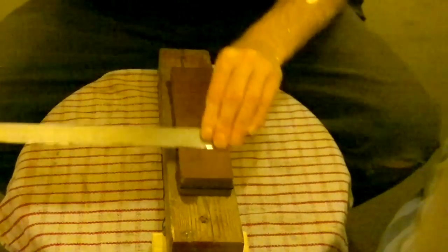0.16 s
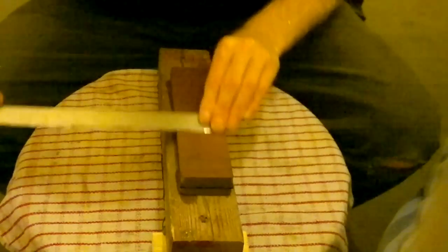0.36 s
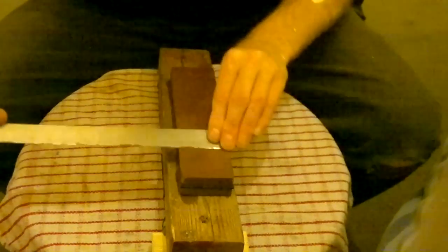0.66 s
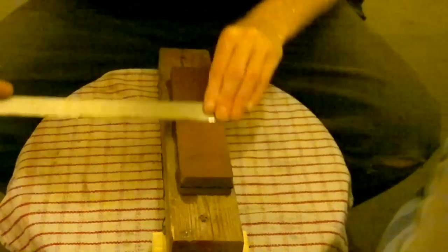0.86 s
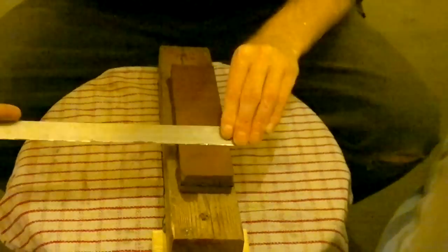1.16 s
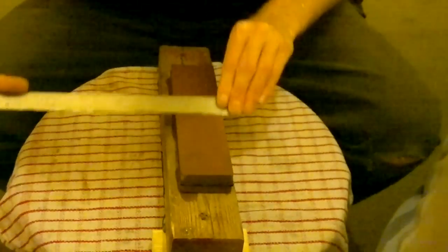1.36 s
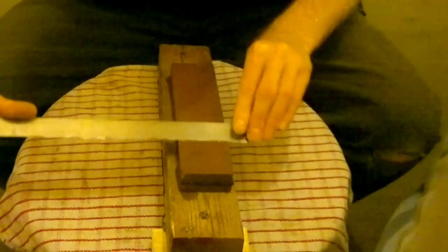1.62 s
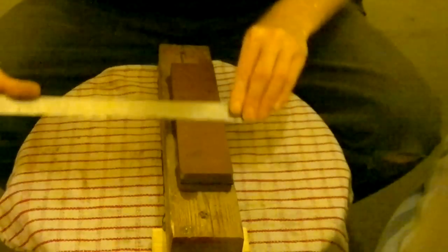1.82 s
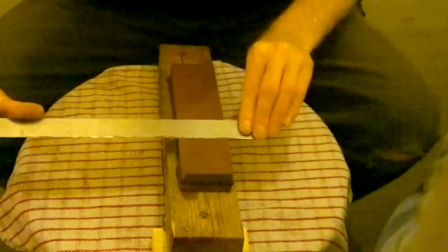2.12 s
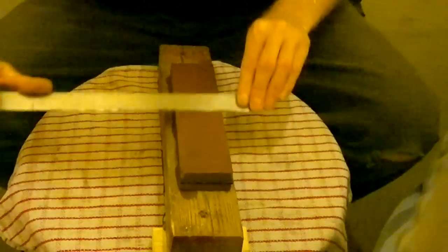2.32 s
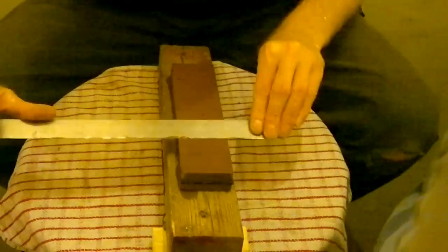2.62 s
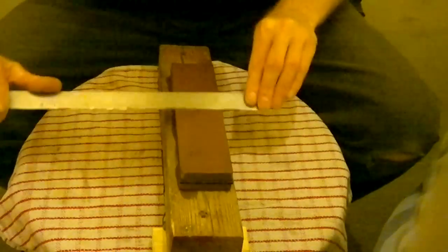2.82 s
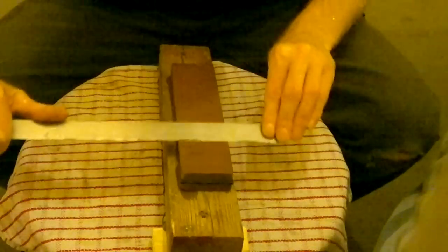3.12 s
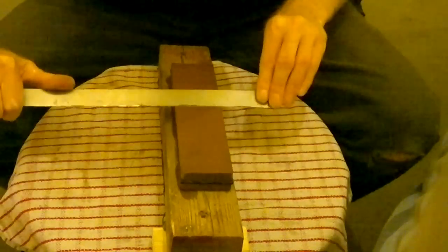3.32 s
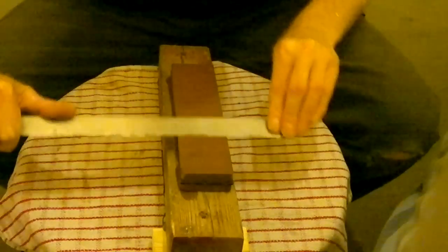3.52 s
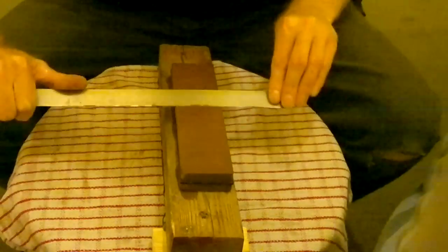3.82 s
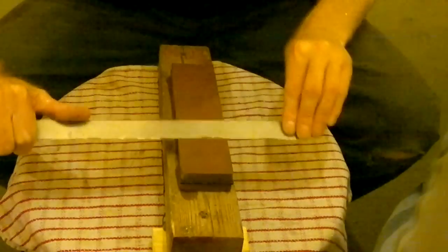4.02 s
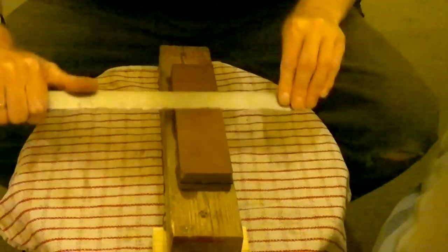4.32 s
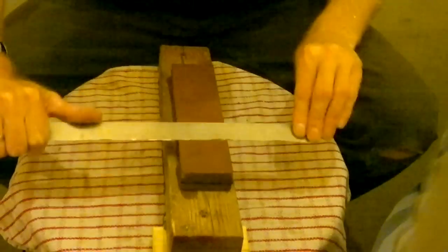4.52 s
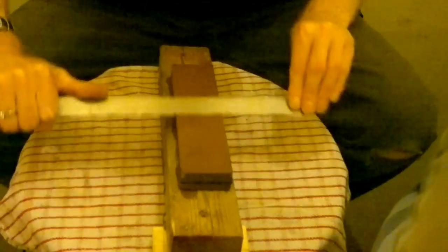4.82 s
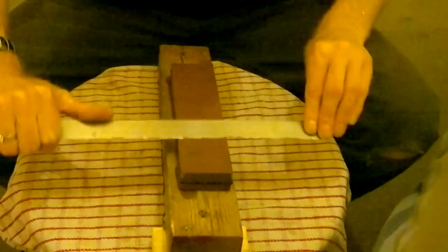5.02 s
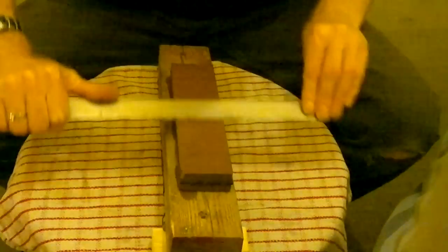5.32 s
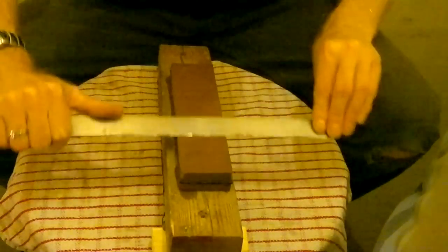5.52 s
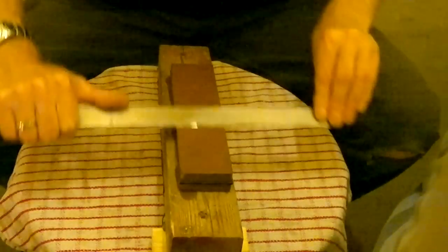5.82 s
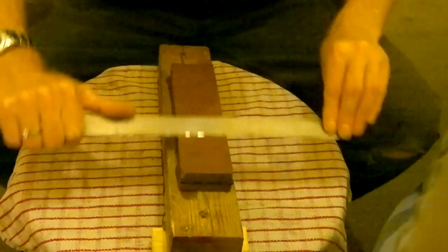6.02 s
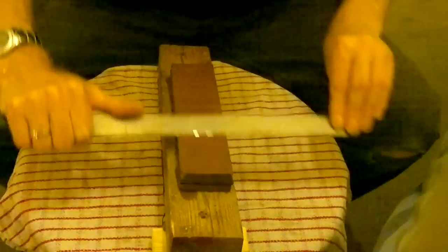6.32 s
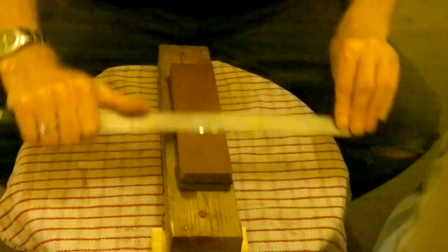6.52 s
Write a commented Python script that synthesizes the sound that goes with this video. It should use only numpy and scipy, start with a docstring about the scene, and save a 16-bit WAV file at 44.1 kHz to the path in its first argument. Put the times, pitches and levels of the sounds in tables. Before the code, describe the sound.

Steady, fast scraping of steel on fine stone, a sandy 'shick-shick' with airy hiss and slight blade ringing. Strokes alternate in strength, pushes often fuller than pulls, with tiny gaps between them. Later, faint dull bumps of the board on cloth come between strokes. Heard close and dry in a small indoor space, over very quiet rumble and a weak wavering mains hum.

```python
"""A steel blade is pushed and pulled over a wet whetstone, about four strokes a second, in a quiet room.
Random grain contacts make the scratch and drive damped blade resonances, which change from tip to heel.
Body, scrape and hiss bands follow a sliding-speed curve; a moving resonance adds the bite.
A short noise tail is the room; the board bumps dully on the cloth; noise rumble and a sine hum lie below."""
import sys
import numpy as np
from scipy import signal
from scipy.fft import rfft, irfft
from scipy.io import wavfile
from scipy.ndimage import uniform_filter1d

SR = 44100
rng = np.random.default_rng(int(sys.argv[2]) if len(sys.argv) > 2 else 0)


def master(y):
    """Save y as 16-bit WAV."""
    cut = np.clip(np.atleast_2d(y).T, -1, 1)
    pcm = np.round(cut * 32767)  # scale
    wavfile.write(sys.argv[1], SR, pcm.astype(np.int16))


N = 293706


# Colour of grit on steel, before the bands are levelled: freq_hz, relative_db_per_hz
SCRATCH_COLOUR = [(760, -31), (1300, -47), (1440, -35.5), (1880, -17.5), (2660, -11), (3170, -3),
                  (4780, -3.5), (5260, -4), (6550, -5.5), (8610, -6), (10200, -3), (11200, -5.5),
                  (15200, -6), (16000, -15)]
# Scratch, left over right: freq_hz, left_right_db
SCRATCH_BALANCE = [(1500, 8.5), (2600, 3), (3300, -2), (4900, 3.5), (6500, -3), (7400, -6.5), (10000, -0.5),
                   (12000, -3), (15500, -8.5)]
# Scratch, likeness of the channels: freq_hz, likeness_0_to_1
SCRATCH_LIKENESS = [(2000, 0.3), (3700, 0.22), (5200, 0.6), (6500, 0), (9500, 0.32), (12000, 0.74),
                    (15000, 0.5)]
# Scratch, phase by which left leads: freq_hz, lead_rad
SCRATCH_PHASE = [(1800, 3), (3500, 1.5), (4500, 4.5), (5500, 3.5), (6500, 1.8), (7500, -0.5), (9000, -1.5),
                 (11000, -1.9), (14000, 2.5)]
BODY_TOP_HZ, HISS_BOTTOM_HZ = 2900, 7500   # scrape lies between
RING_DB = -5.5   # all fixed modes together
BITE_WIDTH_HZ, BITE_SIDE_DB = 3500, 1.5   # left up, right down
BODY_FLICKER_DB = 2.5
SPEED_POWER = 19


def strokes():
    """Rubbing: grit and ringing blade, split in bands whose gain is a power of sliding speed."""
    hiss_db, tilt_db, body_db, left_right_db, bite_hz, bite_db, lower_db, upper_db = stroke_colour()
    grains = grit()
    driven = grains + from_db(RING_DB) * blade_ring(grains) + gliding_ring(grains, lower_db, upper_db)
    rubbed = stereo_colour(driven, SCRATCH_COLOUR, SCRATCH_BALANCE, SCRATCH_LIKENESS, SCRATCH_PHASE)

    body = lowpass(rubbed, BODY_TOP_HZ)
    below_hiss = lowpass(rubbed, HISS_BOTTOM_HZ)
    hiss = patchy(rubbed - below_hiss, tilt_db)
    scrape = below_hiss - body
    # the pressed part of the blade: a broad hump that moves with pressure and angle
    hump = moving_resonance(scrape, bite_hz, BITE_WIDTH_HZ)
    hump = moving_resonance(hump, bite_hz, BITE_WIDTH_HZ)
    scrape = scrape + from_db(bite_db + np.array([[BITE_SIDE_DB], [-BITE_SIDE_DB]])) * hump

    layers = evened(scrape)
    layers = layers + from_db(hiss_db) * evened(hiss)
    layers = layers + from_db(body_db + BODY_FLICKER_DB * drift(9.2)) * evened(body)
    side_db = left_right_db * np.array([[.5], [-.5]])
    return layers * stroke_speed() ** SPEED_POWER * from_db(catches() + side_db)


# One row per stroke, push and pull in turn; *_after_s count from the turn, release_s back from the next turn:
# turn_s, turn_level_db, rest_s, attack_end_after_s, attack_end_level_db, middle_after_s, middle_level_db,
# release_s, release_start_level_db, hiss_over_scrape_db, hiss_rise_db, body_over_scrape_db,
# bite_early_hz, bite_late_hz, bite_early_db, bite_late_db, lower_glide_db, upper_glide_db
STROKES = [(-0.19, -60.0, 0.006, 0.04, -40.0, 0.12, -40.0, 0.049, -41, -7.5, -1, -24, 4600.0, 5380.0, 1.5, -1, 0.6, 2.8),
           (0.044, -66.5, 0.006, 0.035, -52, 0.088, -47, 0.041, -46.5, -1, -2, -14.5, 4670.0, 4650, 8, 6, 4, 1.8),
           (0.259, -63.2, 0.009, 0.035, -40, 0.096, -38.5, 0.048, -42, -4.0, 0.5, -33, 4640, 4800, -21, -7.9, 1, 2.4),
           (0.499, -61.5, 0.009, 0.036, -44, 0.081, -45.5, 0.043, -46, -3, 3, -20, 4800, 4100, 4, 6, 7.5, 4.5),
           (0.725, -68, 0.0087, 0.034, -35, 0.079, -32.5, 0.056, -38, -5, 0.5, -25.5, 5350.0, 5200, 1.9, -1, -15, 4),
           (0.978, -53, 0.014, 0.032, -37.5, 0.11, -44.5, 0.071, -33, -4, -2, -22.5, 4840, 4200, 2, 6, 5, 4.0),
           (1.206, -52.5, 0.007, 0.046, -33, 0.132, -29, 0.058, -35.5, -7.5, -0.5, -29, 4430, 4230, -1, -2, -2, 2.7),
           (1.465, -52.5, 0.01, 0.055, -39.5, 0.14, -37, 0.047, -48, -4.5, -0.2, -24.5, 4670, 5160, -5, -17, -0.0, 1.4),
           (1.707, -73, 0.009, 0.05, -39.5, 0.13, -35, 0.069, -36, -4.5, -5, -22, 4780, 4700.0, -14.4, -20, 1.5, 2),
           (1.967, -59, 0.006, 0.046, -37.5, 0.061, -42.5, 0.039, -47, -4, -1.2, -23.5, 5000, 4900, -5, -6, 5, 2.2),
           (2.177, -67.5, 0.009, 0.056, -38.5, 0.13, -35.5, 0.052, -40, -3.2, -1, -22, 4540.0, 4440, -6, -12, 6, 4.2),
           (2.42, -54.5, 0.007, 0.037, -38.5, 0.13, -48.1, 0.045, -43.5, -3.5, -2, -23.5, 4530.0, 4960.0, -13, -25, 3, 1.5),
           (2.646, -67.5, 0.011, 0.037, -41.5, 0.1, -35.5, 0.041, -38.5, -4, 1.0, -24, 4720.0, 4550.0, -11, -14, -1, 1.7),
           (2.892, -55.9, 0.002, 0.048, -36, 0.13, -42, 0.058, -38, -5, 1, -22.2, 4700, 5040, -10, -10, -2, 2.4),
           (3.143, -56.6, 0.007, 0.034, -39.4, 0.11, -36, 0.059, -35.5, -4.5, -2, -23, 4800, 4620.0, -15, -16, 5.5, 3.0),
           (3.384, -50, 0.007, 0.029, -38.5, 0.061, -35, 0.077, -39.4, -4, 2.8, -17.5, 4220, 4950, -1.5, -8.1, 5.5, 1.8),
           (3.62, -67, 0.0065, 0.038, -40.5, 0.14, -37.5, 0.049, -42.9, -1, 3, -17.5, 4800, 5100, -6, -5, -3, 5.1),
           (3.857, -58.4, 0.007, 0.041, -41, 0.17, -45.5, 0.039, -51.5, -1, 0, -21, 4930.0, 4740, -7.5, -3.4, 2, 2.9),
           (4.095, -73.5, 0.007, 0.039, -43, 0.11, -38, 0.044, -41.5, -0.5, 0.5, -18, 4500, 4660.0, -4, -2.3, 4, 1.4),
           (4.33, -59.5, 0.004, 0.044, -41.5, 0.14, -48.5, 0.039, -49.5, -0.8, 0.2, -18.5, 4560, 4940, -3.6, -2, 1.4, 3.4),
           (4.568, -70, 0.007, 0.047, -42, 0.11, -38.5, 0.054, -41.5, -0.5, -1.5, -16, 4910.0, 4820.0, -8, -3, 1.2, 3.8),
           (4.805, -58.5, 0.007, 0.027, -44, 0.055, -39, 0.038, -52, -3, 0.5, -22.4, 4760.0, 4750.0, -3, -1.9, -3, 4.2),
           (5.033, -73.5, 0.007, 0.049, -40, 0.13, -36, 0.055, -38.5, -3, 2.5, -17, 4780.0, 4800, -9, 0, 2, 3.2),
           (5.278, -57.5, 0.004, 0.03, -45, 0.083, -39.5, 0.068, -43, -2, -1, -18, 4700, 4730, -5, -3, 5, 2.7),
           (5.512, -67, 0.01, 0.037, -47.5, 0.11, -42, 0.038, -46.5, -0.5, 1, -16, 4750, 4850, -7, -4, 5, 1.6),
           (5.746, -61.5, 0.003, 0.041, -42.5, 0.057, -42.5, 0.028, -55.7, -1.5, 0.8, -19.5, 4700, 4480, -8.4, -4.4, 1.5, 2.3),
           (5.982, -73, 0.008, 0.049, -42, 0.092, -42, 0.047, -37.5, -3, -0.5, -18.5, 4770.0, 4950, -8, -5, 0, 1.3),
           (6.218, -51, 0.0076, 0.05, -37.5, 0.15, -46.5, 0.041, -53.5, -4.5, 0, -22, 4660, 5030, -8, -10, -2, 2.6),
           (6.461, -71.6, 0.006, 0.056, -39, 0.06, -40.5, 0.04, -38.5, -3.5, -0.6, -20, 4770, 4700.0, -10, -1, 1, 2)]
LAST_TURN_S, LAST_TURN_DB = 6.71, -60
HALFWAY_UP, HALFWAY_DOWN = 0.54, 0.53   # share of the speed step held halfway through attack, release


def stroke_speed():
    """Relative sliding speed: rest, attack, middle, release; straight between the points."""
    turn, turn_db, rest, attack, early_db, middle, middle_db, release, late_db = np.transpose(STROKES)[:9]
    next_turn = np.append(turn[1:], LAST_TURN_S)
    next_turn_db = np.append(turn_db[1:], LAST_TURN_DB)
    levels_db = np.array([turn_db, early_db, middle_db, late_db, next_turn_db])
    slow, early, mid, late, last = from_db(levels_db / SPEED_POWER)
    points_s = np.c_[turn, turn + rest, turn + (rest + attack) / 2, turn + attack, turn + middle,
                     next_turn - release, next_turn - release / 2].ravel()
    half_up = slow + HALFWAY_UP * (early - slow)
    half_down = last + HALFWAY_DOWN * (late - last)
    speed = np.c_[slow, slow, half_up, early, mid, late, half_down].ravel()
    order = np.argsort(points_s)
    points_s = np.append(points_s[order], LAST_TURN_S)
    speed = np.append(speed[order], last[-1])
    return in_time(np.c_[points_s, speed])[0]


# Shape shared by all pushes, added to each stroke's own values:
# stroke_share_0_to_1, hiss_db, hiss_tilt_db, body_db, left_right_db, bite_shift_hz, bite_db
PUSH_SHAPE = [(0, -1, -4, -17, 3.5, -200, 2), (.08, -7, 0, -1, 8.5, -100, 1), (.16, -3, 0, 2, 3.5, -100, 2),
              (.24, 0.2, -1, 2.5, 0.5, 33, 2.5), (.4, 0.6, 0.5, -1.5, 0.7, 100, 1.5),
              (.6, 0.6, 2, -2, 0, 200, 0.5), (.8, -2.5, 2, 3.5, -1, 96, -6),
              (.9, -3.5, -5, 3, -2.5, 100, -4), (.99, -4, -4, -6, 0, 100, 1)]
# The same for all pulls:
# stroke_share_0_to_1, hiss_db, hiss_tilt_db, body_db, left_right_db, bite_shift_hz, bite_db
PULL_SHAPE = [(0, 0, 0, -0.39, 2.2, 100, 2), (.08, -3.5, -3, 1.5, 4.3, -50, 1.5),
              (.16, -3.5, 1.5, 1.7, 3.1, -150, 0.5), (.24, 0.5, 0, 0, 0.83, 30, 0.5),
              (.4, 0.8, 0, -2.4, 0.32, 100, 1), (.6, 1, 0.5, -1.5, 0.6, 152, 1.5),
              (.8, -2, -2, 0.64, 0.5, 100, 1), (.9, -3, -4, -3, 0.6, 50, -3), (.99, -6, -4, 0, 2.7, 30, -3)]
EARLY_SHARE, LATE_SHARE = .3, .7   # early values hold before, late values after


def stroke_colour():
    """Band, side, bite and ring curves: pressure and angle through a push or pull, plus each stroke's own."""
    ends_s = [row[0] for row in STROKES[1:]] + [LAST_TURN_S]
    rows = []
    for k, (row, end_s) in enumerate(zip(STROKES, ends_s)):
        turn_s = row[0]
        hiss_db, rise_db, body_db, early_hz, late_hz, early_db, late_db, lower_db, upper_db = row[9:]
        shape = (PUSH_SHAPE, PULL_SHAPE)[k % 2]
        for share, more_hiss_db, tilt_db, more_body_db, left_right_db, shift_hz, more_bite_db in shape:
            late = np.clip((share - EARLY_SHARE) / (LATE_SHARE - EARLY_SHARE), 0, 1)
            rows.append((turn_s + share * (end_s - turn_s),
                         hiss_db + more_hiss_db + rise_db * (late - .5),
                         tilt_db,
                         body_db + more_body_db,
                         left_right_db,
                         early_hz + late * (late_hz - early_hz) + shift_hz,
                         early_db + late * (late_db - early_db) + more_bite_db,
                         lower_db, upper_db))
    return in_time(rows)


# The edge catches the stone soon after a turn: catch_s, jump_db
CATCHES = [(0.284, 2), (0.525, 1), (0.754, 0.5), (1.0, 2), (1.234, 3), (1.741, 4), (2.002, 3), (2.225, 4),
           (2.672, 1), (3.168, 3), (3.649, 3), (4.126, 2), (4.602, 1), (4.829, 1), (5.057, 1), (5.543, 2),
           (6.022, 2.5), (6.486, 4)]
CATCH_FADE_S = 0.01


def catches():
    """Level change in dB as the edge catches: held back by half the jump, then ahead by half, both fading."""
    t = np.arange(N) / SR
    return sum(jump_db / 2 * np.sign(t - s) * np.exp(-np.abs(t - s) / CATCH_FADE_S)
               for s, jump_db in CATCHES)


GRAINS_PER_S, GRAIN_SPREAD_DB = 16000, 1.5


def grit():
    """Two trains of uneven grain contacts of random sign, coming in clumps where the edge bites."""
    size_db = GRAIN_SPREAD_DB * np.minimum(rng.exponential(1, (2, N)), 5)
    sizes = from_db(size_db) * rng.choice([-1, 1], (2, N))
    hits = rng.random((2, N)) < GRAINS_PER_S / SR
    clumps_db = 0.15 * drift(23) + 1.0 * drift(520)
    return rms_one(sizes * hits) * from_db(clumps_db)


# Blade modes, levels before the common ring level: mode_hz, width_hz, tip_db, middle_db, heel_db
BLADE_MODES = [(3252, 66, 0, 1.6, 0.76), (3778, 48, 8.5, 3, 2.2), (4173, 140, 7.5, 2.4, 4.5),
               (4620, 75, 6.5, 1.4, 1), (4865, 73, 8, 1.6, 0.33), (5165, 49, 10, 0.84, 0.33),
               (5690, 68, 9, 0.1, 0.033), (7040, 44, -18, 2.7, 1.1), (7230, 42, -2, 1.7, 0.67),
               (11000, 110, 4, 7.9, 1.6)]
# Contact along the blade: time_s, place_0_tip_to_1_heel
CONTACT_PLACE = [(0, 0.076), (1.4, 0.15), (3.3, 0.64), (6.66, .99)]
FLICKER_DB = 4


def blade_ring(grains):
    """Grains drive each mode; its strength follows the contact place and flickers as the edge slides."""
    place, = in_time(CONTACT_PLACE)
    out = np.zeros((2, N))
    for mode_hz, width_hz, tip_db, middle_db, heel_db in BLADE_MODES:
        level_db = np.interp(place, [0, .5, 1], [tip_db, middle_db, heel_db])
        strength = from_db(level_db + FLICKER_DB * drift(5.4))
        out += resonance(grains, mode_hz, width_hz)[0] * strength
    return out


# Two resonances of the free blade length, gliding with the contact: time_s, lower_hz, upper_hz
GLIDES = [(0, 6540, 10800), (1.3, 6480, 10600), (2.05, 6800, 10900), (2.3, 6370, 11000), (3.4, 6450, 10920),
          (3.75, 6360, 11100), (4.2, 6400, 11200), (5.3, 6420, 11170), (5.7, 6310, 11340),
          (6.66, 6400, 11100)]
LOWER_WIDTH_HZ, UPPER_WIDTH_HZ = 290, 280


def gliding_ring(grains, lower_db, upper_db):
    """Grains drive two resonances of the free blade length, which glide."""
    lower_hz, upper_hz = in_time(GLIDES)
    lower = from_db(lower_db) * moving_resonance(grains, lower_hz, LOWER_WIDTH_HZ)
    upper = from_db(upper_db) * moving_resonance(grains, upper_hz, UPPER_WIDTH_HZ)
    return lower + upper


def patchy(x, tilt_db):
    """Hiss colour tilts with the stroke and shifts as wet and dry patches of stone pass under the edge."""
    hz, spectrum = np.arange(N // 2 + 1) * SR / N, rfft(x)
    centres_hz = np.linspace(7000, 16000, 10)
    out = np.zeros_like(x)
    for k, weights in enumerate(np.eye(len(centres_hz))):
        band = irfft(spectrum * np.interp(hz, centres_hz, weights), N)
        out += band * from_db(0.74 * drift(10) + tilt_db * k / len(centres_hz))
    return out


ROOM_T60_S, ROOM_DB = 0.092, -10.5


def room(x):
    """Short diffuse tail: decaying noise, its own in each channel, starting after 4 ms."""
    t = np.arange(SR // 2) / SR
    tail = rng.standard_normal((2, len(t))) * from_db(-60 * t / ROOM_T60_S) * (t > .004)
    tail = tail / np.sqrt(np.sum(tail ** 2) / 2)
    return from_db(ROOM_DB) * signal.fftconvolve(x, tail, axes=1)[:, :N]


# Dull rubs and bumps of the board on the cloth: centre_s, length_s, level_db
BUMPS = [(0.067, 0.29, -67.5), (2.06, 0.031, -64.5), (2.498, 0.03, -65), (3.654, 0.026, -61),
         (4.051, 0.028, -59.5), (4.463, 0.051, -59.5), (4.668, 0.022, -60), (4.91, 0.1, -66),
         (5.14, 0.026, -61), (5.434, 0.034, -64)]
# Bump colour: freq_hz, relative_db_per_hz
BUMP_COLOUR = [(120, -41), (250, 4), (600, 5), (1200, 1.5), (2000, -5), (3000, -45)]
# Bumps and rumble, left over right: freq_hz, left_right_db
LOW_BALANCE = [(40, 12.5), (200, 3), (700, 2.5), (2000, 2.5)]
# Bumps and rumble, likeness of the channels: freq_hz, likeness_0_to_1
LOW_LIKENESS = [(60, 0.33), (130, 0.49), (290, .55), (700, 0.66), (1400, .1)]


def bumps():
    """The board rubs and bumps on the cloth: bell-shaped swells of dull noise."""
    t = np.arange(N) / SR
    swell = sum(from_db(level_db) * np.exp(-((t - centre_s) / length_s) ** 2)
                for centre_s, length_s, level_db in BUMPS)
    return swell * stereo_colour(rng.standard_normal((2, N)), BUMP_COLOUR, LOW_BALANCE, LOW_LIKENESS)


# Room rumble colour: freq_hz, relative_db_per_hz
RUMBLE_COLOUR = [(12, -16), (20, 1), (54, -1.5), (123, -1.5), (174, -6.5), (265, -1.5), (318, -4),
                 (672, -6.5), (1180, -12.5), (1450, -19), (2500, -18), (3250, -55), (5500, -120)]
# Wavering mains hum, peak level midway between left and right: time_s, level_db
HUM_LEVEL = [(0, -73), (.6, -66), (1.5, -74), (1.85, -66), (2.5, -73), (2.67, -71), (2.9, -80), (5.17, -64),
             (5.3, -80), (5.84, -82), (6.1, -68), (6.36, -72), (6.66, -70)]
RUMBLE_DB, HUM_HZ, HUM_SIDE_DB = -63, 49.6, 3


def background():
    """Room rumble as coloured noise, mains hum as one wavering sine, stronger on the left."""
    rumble = stereo_colour(rng.standard_normal((2, N)), RUMBLE_COLOUR, LOW_BALANCE, LOW_LIKENESS)
    hum_db = in_time(HUM_LEVEL)[0] + np.array([[HUM_SIDE_DB], [-HUM_SIDE_DB]])
    hum = np.sin(2 * np.pi * HUM_HZ * np.arange(N) / SR) * from_db(hum_db)
    return from_db(RUMBLE_DB + 1.0 * drift(18)) * rumble + hum


def resonance(x, hz, width_hz, state=None):
    """Two-pole resonance, gain 1 on top; returns sound and filter state."""
    r = np.exp(-np.pi * width_hz / SR)
    state = np.zeros((2, 2)) if state is None else state
    numerator = [(1 - r * r) / 2, 0, (r * r - 1) / 2]
    denominator = [1, -2 * r * np.cos(2 * np.pi * hz / SR), r * r]
    return signal.lfilter(numerator, denominator, x, zi=state)


def moving_resonance(x, centre_hz, width_hz):
    """Resonance whose centre moves, in steps of 256 samples."""
    out, state = np.zeros_like(x), None
    for i in range(0, N, 256):
        out[:, i:i + 256], state = resonance(x[:, i:i + 256], centre_hz[i], width_hz, state)
    return out


def stereo_colour(pair, spectrum, balance, likeness, phase=((1, 0), (2, 0))):
    """Two unrelated signals become coloured left and right of given balance, likeness, phase; mid rms 1."""
    hz = np.arange(N // 2 + 1) * SR / N + 1

    def at(points):
        points_hz, values = np.transpose(points)
        return np.interp(np.log(hz), np.log(points_hz), values)

    left, other = rfft(pair)
    alike = np.clip(at(likeness), 0, 1)
    right = alike * left * np.exp(-1j * at(phase)) + np.sqrt(1 - alike ** 2) * other
    gain = from_db(at(spectrum) + at(balance) * [[.5], [-.5]])
    out = irfft(np.array([left, right]) * gain, N)
    return out / np.sqrt(np.mean(out.mean(axis=0) ** 2))


def lowpass(x, hz):
    """Steep low-pass without delay."""
    return signal.sosfiltfilt(signal.butter(4, hz, fs=SR, output="sos"), x)


def evened(x):
    """Hold the mid level near rms 1 over a running 1/12 s."""
    return x / np.sqrt(uniform_filter1d(x.mean(axis=0) ** 2, size=SR // 12))


def drift(rate_hz):
    """Slow random wander, rms 1: noise through two equal poles at SR / 40, then interpolated."""
    r = np.exp(-80 * np.pi * rate_hz / SR)
    slow = signal.lfilter([1], [1, -2 * r, r * r], rng.standard_normal(N // 40 + 2002))[2000:]
    return np.interp(np.arange(N) / 40, np.arange(len(slow)), rms_one(slow))


def in_time(rows):
    """Columns of a curve (first column time_s), one value per sample."""
    time_s, *columns = np.transpose(rows)
    return [np.interp(np.arange(N) / SR, time_s, column) for column in columns]


def rms_one(x):
    """Scale to rms 1."""
    return x / np.sqrt(np.mean(x ** 2) + 1e-20)


def from_db(db):
    """Decibels to gain."""
    return 10 ** (np.asarray(db) / 20)


def scene():
    """Blade on stone, its room tail, the board and the background."""
    blade = strokes()
    return blade + room(blade) + bumps() + background()


CUTOFF_HZ = 15740


def record(dry):
    """Cut the top steeply."""
    return signal.sosfilt(signal.ellip(14, .5, 70, CUTOFF_HZ, fs=SR, output="sos"), dry)


dry = scene()
out = record(dry)
master(out)
```